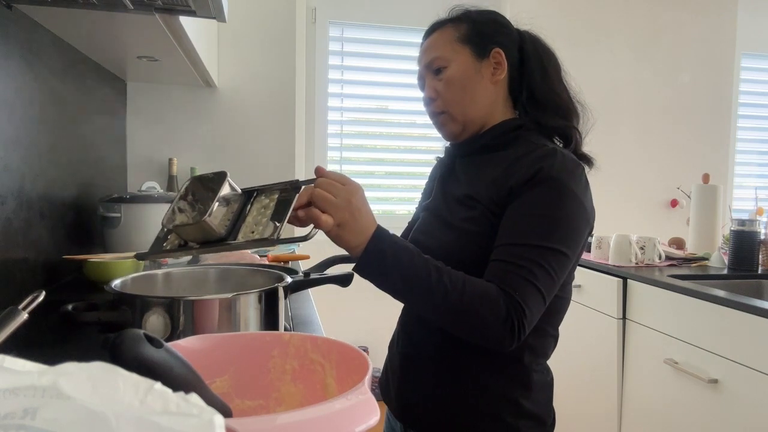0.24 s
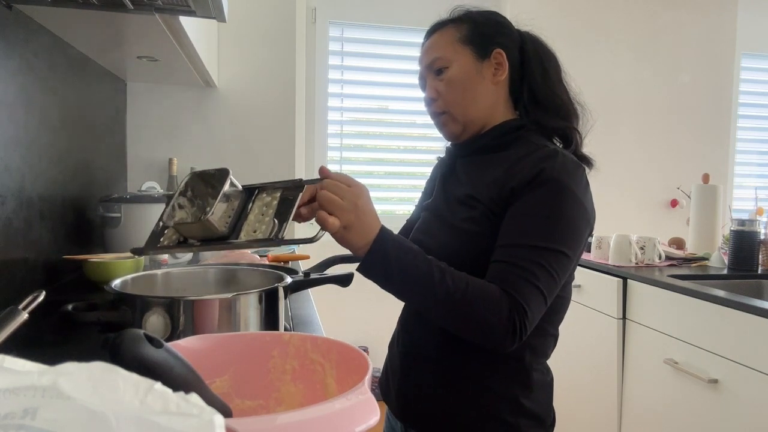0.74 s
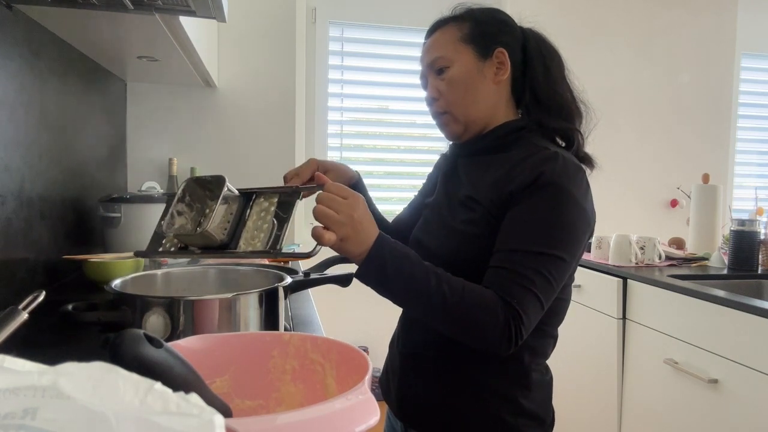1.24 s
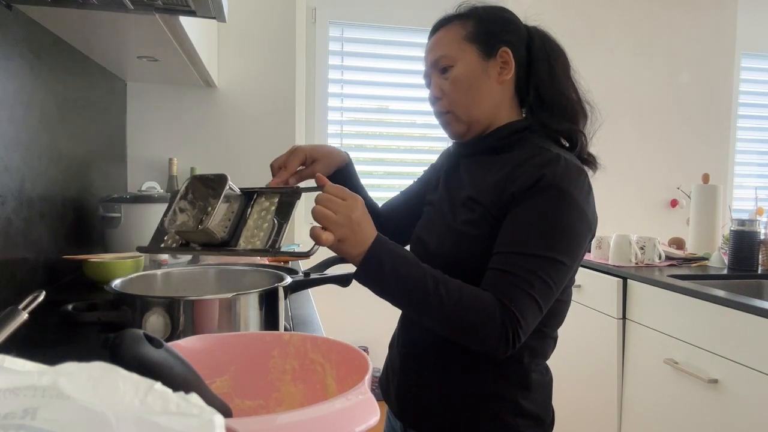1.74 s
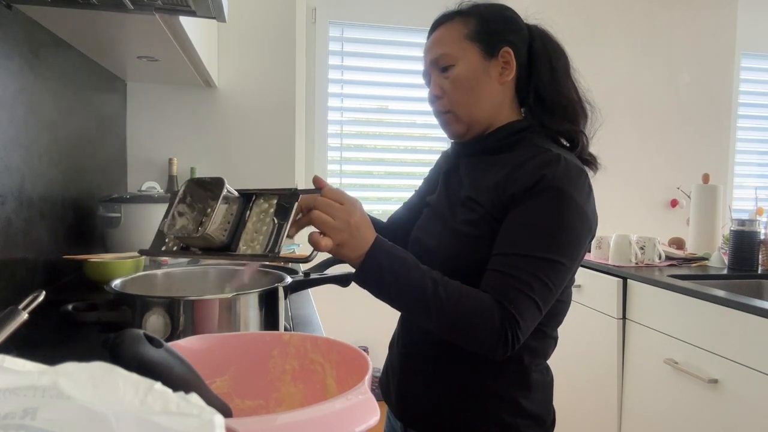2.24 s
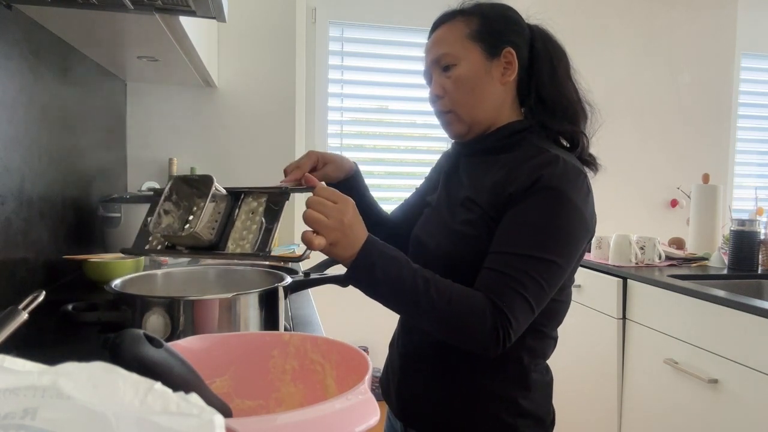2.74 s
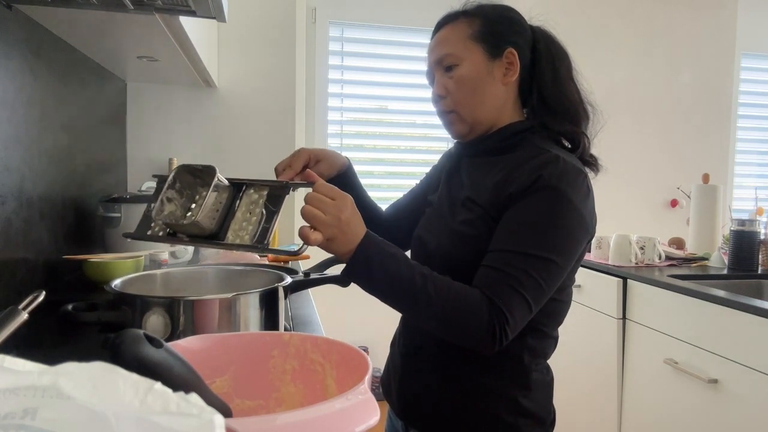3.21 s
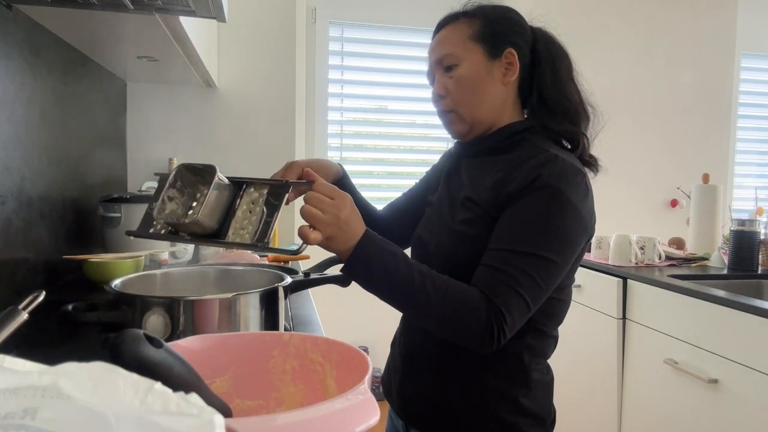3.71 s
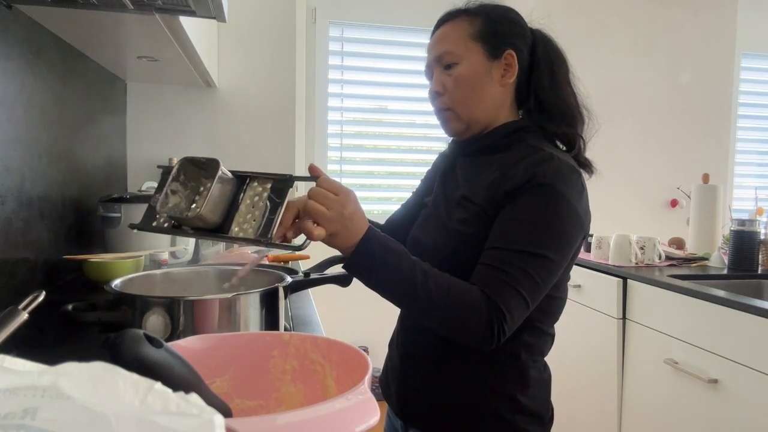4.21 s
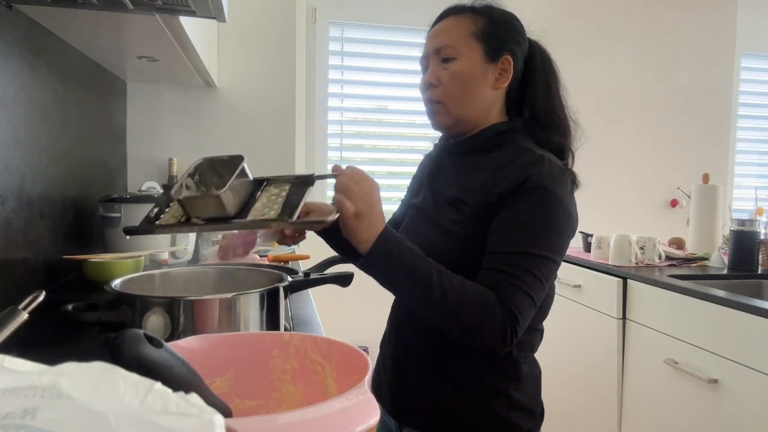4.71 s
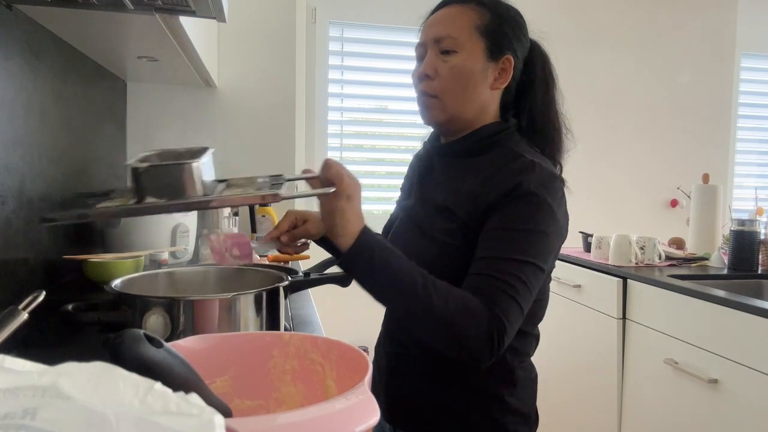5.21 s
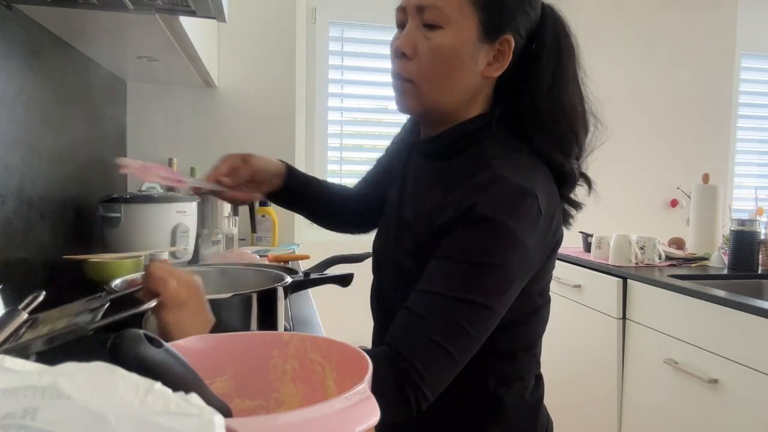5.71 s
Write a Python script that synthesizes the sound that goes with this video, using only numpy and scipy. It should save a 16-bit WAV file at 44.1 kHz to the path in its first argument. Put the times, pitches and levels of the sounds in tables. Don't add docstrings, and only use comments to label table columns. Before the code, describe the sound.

Steady low extractor-fan drone with faint simmering hiss and tiny spitting bubbles, then a sudden bright rattling clank of sheet metal on a worktop.

```python
import sys
import numpy as np
from scipy import signal
from scipy.fft import rfft, irfft, next_fast_len
from scipy.io import wavfile
from scipy.ndimage import uniform_filter1d

SR = 44100
rng = np.random.default_rng(int(sys.argv[2]) if len(sys.argv) > 2 else 0)


def makeup_ratio(level_db):
    decades = np.asarray(level_db, float) / 20
    return 10 ** decades


def pcm_store(signal):
    levels = np.round(np.clip(np.atleast_2d(signal), -1, 1) * 32767)
    wavfile.write(sys.argv[1], SR, levels.astype(np.int16).T)


N = 262395
T = np.arange(N) / SR

# f/Hz, density/(dB per Hz)
ROAR_SPECTRUM = [(25, -36.5), (45, -38), (58, 2.5), (80, 0), (130, -1), (195, -8.5), (230, -14), (275, -22),
                 (310, -17), (450, -17.5), (1300, -18.5), (1700, -21.5), (4000, -26), (12000, -43)]
# f/Hz, width/Hz, gain/dB
DUCT_RESONANCES = [(58, 12, 3), (67.4, 8.5, -20), (176, 15, 5.5), (345, 64, 9), (539, 41, 4.5),
                   (790, 172, 10), (1068, 70, 5.5), (1354, 43, 3.5), (1937, 84, 4), (2810, 190, 2.5)]
# f/Hz, coherence/(0-1), left lead/rad, left-right level/dB
PORT_COHERENCE = [(40, .99, .1, 7), (60, 0.88, 0.14, -6), (101, 0.98, 0.073, 3.5), (195, 0.98, 0.28, 0.5),
                  (278, 0.22, 0.23, -4), (370, 0.4, 1, -2), (470, 0.43, 0.16, 2), (770, 0.24, 0.62, 3),
                  (880, 0.65, 0.68, 8), (1350, 0.58, 0.83, -0.5), (1700, 0.7, 1.63, 0), (2520, 0, 1.9, -.5),
                  (5900, 0, 2.3, -2), (9000, 0, 2.7, -16)]
# f/Hz, density/(dB per Hz)
FIZZ_SPECTRUM = [(1500, -48), (3000, -7), (6000, -6.5), (8000, 0.5), (9500, 5), (10500, 1.5), (12500, 1),
                 (14000, 2.5), (15500, 3), (20000, -9)]
# t/s, level/dB
SIMMER_LEVEL = [
    (0.0, -47.5),
    (.9, -46.5),
    (3.2, -48.5),
    (5.4, -47.5),
    (5.9, -49),
]
# t/s, peak level/dB
SPITS = [(0.1274, -30), (0.4494, -32), (0.6892, -28), (0.7544, -26.5), (0.868, -25.5), (0.9178, -31),
         (1.3191, -36), (1.7214, -28), (1.9994, -33), (2.1634, -29), (2.4496, -31), (2.8873, -32),
         (3.127, -38), (3.6498, -37), (3.7022, -26.5), (4.0677, -30), (4.6653, -30), (4.7494, -36),
         (4.8114, -29), (5.1237, -21.5), (5.1702, -34.5), (5.2139, -32), (5.2995, -28)]
# f/Hz, level/dB
WALL_SCATTER = [(2000, -6.5), (6000, 8.5), (8000, -4), (11000, -8), (15000, -16.5)]
# t/s, gain/1
POT_REFLECTIONS = [(.0011, 0.15), (.0023, -0.28), (.0041, .2), (.0067, .15)]
# f/Hz, level/dB, t60/s, left-right level/dB, left lead/rad
HOPPER_MODES = [(7100, -19.5, 0.06, -2, -1.6), (9800, -40, 0.12, 2, -1), (12300, -30, 0.054, 2, -1.5),
                (13400, -36, 0.16, 0, 2)]
# t/s, level/dB, favoured modes/(octaves above 1 kHz)
BLOWS = [(5.747, -11, 0.57), (5.759, -4, -0.065), (5.778, -7.5, .3), (5.7834, 5, 0.77), (5.801, 1.5, 1.86),
         (5.811, -4, 0.16), (5.835, 1, 1.93), (5.854, -9, 0.25), (5.871, -15, -0.23), (5.899, -13, 1.9),
         (5.92, -15.5, 1.7)]
# f/Hz, density/(dB per Hz)
RATTLE_SPECTRUM = [(150, -16), (400, -5), (1200, 2), (2000, 5), (2800, -8), (4600, -14), (8000, -20),
                   (14000, -55)]
# f/Hz, level/dB, left-right level/dB, left lead/rad
TOOL_MODES = [(391, -20, -4, 0.2), (620, -17, 8, 0.9), (651, -14, 7, 0.9), (735, -21, 4, 2.4),
              (850, -19, -3, 0.2), (910, -18, 4, 1.8), (1025, -13, -2, 1.6), (1091, -15, -3, 2.3),
              (1146, -16, -3, 2.3), (1211, -9, -1, 1.4), (1268, -9, 0, 1.2), (1320, -14, -1, 1.0),
              (1450, -21, -2, -0.1), (1507, -19, 1, 0.1),
              (1783, -15, 4, 2.8), (1893, -20, 4, -3.0), (2299, -12, 1, 2.8), (2555, -23, 1, 3.1),
               (2977, -20, 3, -2.8), (3015, -15, 3, -2.7), (3440, -18, 2, 2.0), (3474, -17, 2, 2.0),
               (3724, -5, -1, -2.3), (4040, -22, 1, -0.4), (4910, -24, 1, -2.5), (5570, -20, 1, -0.6),
               (5609, -20, 1, -0.6),
              (8864, -29, 0, -0.7), (10090, -37, 0, 0.1), (13700, -39, 0, 3.0)]
PART_EDGES = [800, 2000, 2700, 6500]
PART_LEVEL = [2.2, -0.7, 0.5, 0, 12]
PART_T60 = [0.037, 0.042, 0.16, 0.11, 0.28]
# f/Hz, t60/s
ROOM_T60 = [(150, 0.75), (1000, 0.36), (4000, 0.13), (10000, 0.12)]

TICK_S = 5.7452
HALVES = np.array([[0.5], [-0.5]])
RIGHT = np.array([[0], [1]])


def evened(x):
    return x / np.sqrt(np.mean(x ** 2) + 1e-20)


def over_time(rows):
    s, *columns = np.transpose(rows)
    return [np.interp(T, s, c) for c in columns]


def over_hz(rows, hz):
    f, *columns = np.transpose(rows)
    return [np.interp(np.log(hz + 1), np.log(f), c)[:, None] for c in columns]


def wander(top_hz):
    z = rfft(rng.standard_normal(N))
    z[0] = 0
    lowpass = 1 + (np.fft.rfftfreq(N, 1 / SR) / top_hz) ** 2
    return evened(irfft(z / lowpass, N))


def coloured(x, rows):
    size = next_fast_len(N)
    gain = makeup_ratio(over_hz(rows, np.fft.rfftfreq(size, 1 / SR))[0][:, 0])
    return irfft(rfft(x, size) * gain, size)[..., :N]


def from_left(x):
    delay_s = 105e-6
    size = next_fast_len(N)
    late = np.exp(-2j * np.pi * np.fft.rfftfreq(size, 1 / SR) * delay_s)
    return np.array([x, irfft(rfft(x, size) * late, size)[:N]])


def motor():
    blade_hz, sag_hz_per_s, apart_hz = 86.157, 0.0797, 0.398
    in_step_s, throb_s = 0.46, 0.0589
    blade_db, uneven_db, second_db = -40, -4.2, -10
    hum_hz, hum_db = 99.973, -38
    t = T - throb_s
    turn = 2 * np.pi * (blade_hz * t - sag_hz_per_s * t ** 2 / 2)
    slip = np.pi * apart_hz * (T - in_step_s)
    lag = 0.26 * RIGHT
    port_gain = makeup_ratio(np.array([[1.4], [-1.6]]))
    wheels = 0
    for phase, db in ((turn + slip, blade_db), (turn - slip, blade_db + uneven_db)):
        second = makeup_ratio(second_db + 3.9 * wander(1.3)) * np.cos(2 * phase - lag)
        wheels = wheels + makeup_ratio(db) * (second - np.cos(phase - lag))
    hum = makeup_ratio(hum_db) * np.cos(2 * np.pi * hum_hz * t - lag)
    return np.sqrt(2) * port_gain * (wheels - hum)


def roar():
    frames, hz = N // 1024 + 5, np.fft.rfftfreq(4096, 1 / SR)
    a, b, c, d, patches = rng.standard_normal((frames, 2049, 5)).T
    patches = uniform_filter1d(patches, size=30, axis=0)
    patches = evened(uniform_filter1d(patches, size=4, axis=1))
    same, lead, side_db = over_hz(PORT_COHERENCE, hz)
    same = np.clip(same, 0, 1)
    left = a + 1j * b
    right = same * np.exp(-1j * lead) * left + np.sqrt(1 - same ** 2) * (c + 1j * d)
    duct_db = sum(db / (1 + (2 * (hz - f) / width) ** 2) for f, width, db in DUCT_RESONANCES)[:, None]
    z = np.array([left * makeup_ratio(side_db / 2), right / makeup_ratio(side_db / 2)])
    z = z * makeup_ratio(over_hz(ROAR_SPECTRUM, hz)[0] + duct_db + 0.85 * patches)
    return makeup_ratio(-35) * evened(signal.istft(z, nperseg=4096, noverlap=3072)[1][:, :N])


def fizz():
    size = makeup_ratio(4.1 * np.minimum(rng.exponential(1, N), 5))
    happens = rng.random(N) < 2500 / SR
    bursts = size * happens * rng.choice([-1, 1], N)
    direct = evened(0.61 * evened(bursts) + rng.standard_normal(N)) * makeup_ratio(0.94 * wander(9.2))
    direct = direct + sum(gain * np.roll(direct, round(s * SR)) for s, gain in POT_REFLECTIONS)
    scattered = coloured(rng.standard_normal((2, N)), WALL_SCATTER)
    level = makeup_ratio(over_time(SIMMER_LEVEL)[0] + 6.0)
    return level * evened(coloured(from_left(direct) + scattered, FIZZ_SPECTRUM))


def spits():
    impulses = np.zeros(N)
    for s, db in SPITS:
        impulses[round(s * SR)] = makeup_ratio(db)
    t = np.arange(900) / SR
    pop = np.sin(2 * np.pi * 9400 * t) * makeup_ratio(-1 - 60 * t / 0.003)
    spray = np.diff(rng.standard_normal(len(t)), prepend=0) * makeup_ratio(-19 - 60 * t / 0.03)
    spray = spray + np.convolve(spray, pop[:40])[:len(t)]
    return from_left(signal.oaconvolve(impulses, pop + spray)[:N])


def tick():
    age = np.maximum(T - TICK_S, 0)
    bright = np.diff(rng.standard_normal(N), prepend=0)
    return makeup_ratio(-24 - 60 * age / 0.063) * (age > 0) * from_left(bright)


def hopper():
    age = np.maximum(T - TICK_S, 0)
    out = np.zeros((2, N))
    for hz, db, t60, side_db, lead in HOPPER_MODES:
        level = makeup_ratio(db - 60 * age / t60 + side_db * HALVES) * (age > 0)
        out += level * np.sin(2 * np.pi * hz * age - lead * RIGHT)
    return out


def tool():
    rest_s, settle_s, damp_db = 5.857, 0.022, -13
    below, above = 3.5, 9.5
    chance_db, jolt_rad = 1.8, 0.7
    start = round(5.74 * SR)
    t, out = T[start:], np.zeros((2, N))
    modes = TOOL_MODES
    s, strength_db, spot = np.transpose(BLOWS)[:, :, None]
    share_db, jolt = rng.standard_normal((len(BLOWS), len(modes), 2)).T[..., None]
    age = np.maximum(t - s, 0)
    rise = 1 - np.exp(-age / 0.0007)
    rang_before = s < rest_s + settle_s / 4
    damped_db = damp_db * np.clip((t - rest_s) / settle_s, 0, 1) * rang_before
    for k, (hz, db, side_db, lead) in enumerate(modes):
        part = np.searchsorted(PART_EDGES, hz)
        away = np.log2(hz / 1000) - spot
        blow_db = strength_db - np.maximum(above * away, -below * away) + chance_db * share_db[k]
        decay_db = damped_db - 60 * age / PART_T60[part]
        level = rise * makeup_ratio(db + PART_LEVEL[part] + blow_db + decay_db)
        turn = 2 * np.pi * hz * t + 2 * k ** 2 + jolt_rad * (rise * jolt[k]).sum(0)
        swing = np.sin(turn - lead * RIGHT)
        out[:, start:] += np.linalg.norm(level, axis=0) * makeup_ratio(side_db * HALVES) * swing
    return out


def contact_noise():
    both, *each = rng.standard_normal((3, N))
    return np.array([both, np.roll(both, shift=10)]) + 1.1 * np.array(each)


def after_blows(power, t60):
    energy = 0
    for s, db, spot in BLOWS:
        energy = energy + (T > s) * makeup_ratio(power * db - 60 * np.maximum(T - s, 0) / t60) ** 2
    return np.sqrt(energy)


def cracks(noise):
    crack_spectrum = [(300, -5), (1500, 3.0), (6000, -12), (9000, -23)]  # f/Hz, density/(dB per Hz)
    return makeup_ratio(-25) * after_blows(1.6, 0.025) * evened(coloured(noise, crack_spectrum))


def rattle(noise):
    knocks = evened(coloured(noise, RATTLE_SPECTRUM)) * makeup_ratio(4.1 * wander(140))
    return makeup_ratio(-20.5) * after_blows(0.57, 0.1) * knocks


def thud():
    age = np.maximum(T - 5.752, 0)
    level = makeup_ratio(2.3 - 60 * age / 0.031) * (1 - np.exp(-age / 0.0042))
    return level * np.sin(2 * np.pi * 165 * age)


def room(x):
    count, shared = SR // 2, 0.56
    taps = rng.choice([-1., 1.], (2, count)) * (rng.random((2, count)) < 0.05) * (np.arange(count) > 150)
    hz, t, z = signal.stft(taps, SR, nperseg=256)
    tail = signal.istft(z * makeup_ratio(-60 * t / over_hz(ROOM_T60, hz)[0]), SR, nperseg=256)[1]
    tail = np.array([tail[0], shared * tail[0] + np.sqrt(1 - shared ** 2) * tail[1]])
    return signal.fftconvolve(x, tail / np.linalg.norm(tail[0]), axes=1)[:, :N]


def scene():
    noise = contact_noise()
    clatter = tick() + hopper() + makeup_ratio(2.5) * tool() + cracks(noise) + rattle(noise)
    push = thud()
    echoes = makeup_ratio(-0.5) * room(clatter + makeup_ratio(-7) * push)
    return motor() + roar() + fizz() + spits() + clatter + push + echoes


def low_pass(x):
    return signal.sosfilt(signal.butter(12, 15950, fs=SR, output="sos"), x)


def record(dry):
    no_difference, no_sum = (8950, 10280), (13100, 15150)
    knee = 1.05
    power_db = 10 * np.log10(abs(uniform_filter1d((dry ** 2).mean(0), size=400)) + 1e-12)
    fall = T * 6.
    over_db = np.maximum(np.maximum.accumulate(power_db + fall) - fall + 25, 0)
    grip = np.exp(-1 / (0.014 * SR))
    duck_db = 0.36 * signal.lfilter([1 - grip], [1, -grip], over_db)
    left, right = rfft(knee * np.tanh(dry / makeup_ratio(duck_db) / knee))
    hz = np.fft.rfftfreq(N, 1 / SR)
    both = (left + right) / 2 * ((hz < no_sum[0]) | (hz > no_sum[1]))
    apart = (left - right) / 2 * ((hz < no_difference[0]) | (hz > no_difference[1]))
    band = (hz < 15760) / (1 + (24 / (hz + 1)) ** 4)
    joint = irfft(np.array([both + apart, both - apart]) * band, N)
    top = irfft(rfft(joint) * (hz > no_sum[0]), N)
    ducked = uniform_filter1d(1. * (duck_db > 0.8), size=200)
    return low_pass(joint - top * ducked)


dry = scene()
out = record(dry)
pcm_store(out)
```